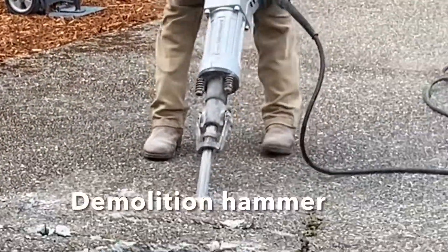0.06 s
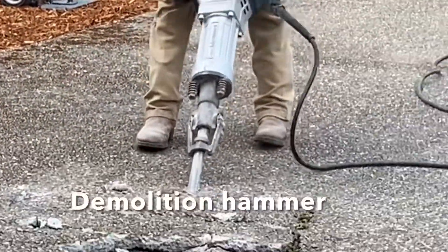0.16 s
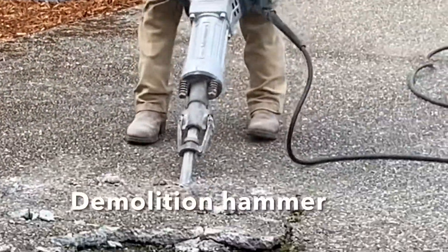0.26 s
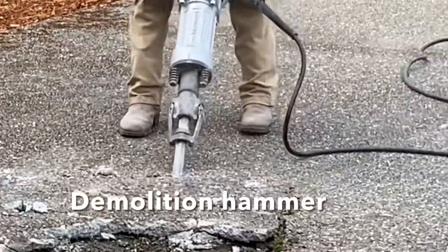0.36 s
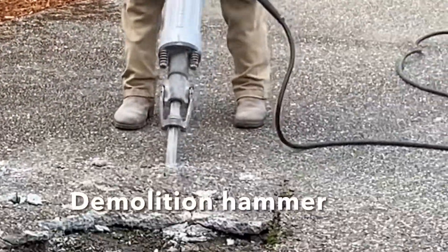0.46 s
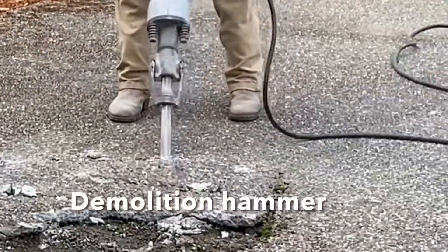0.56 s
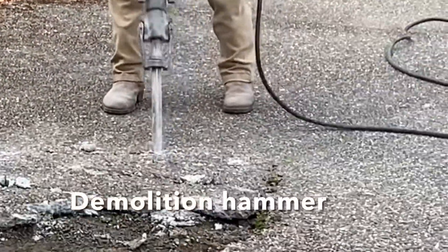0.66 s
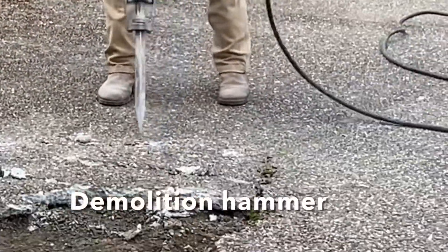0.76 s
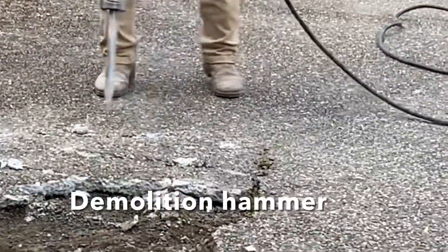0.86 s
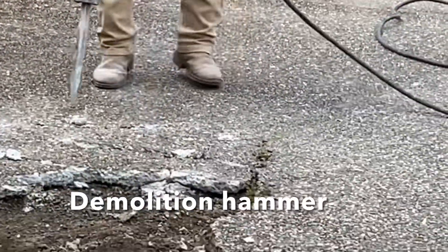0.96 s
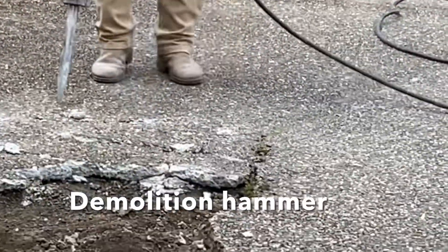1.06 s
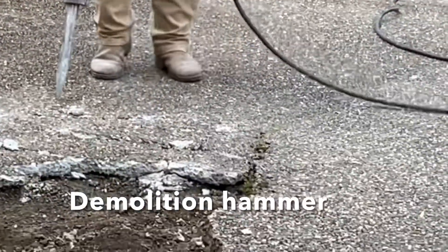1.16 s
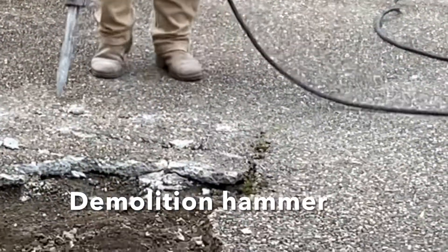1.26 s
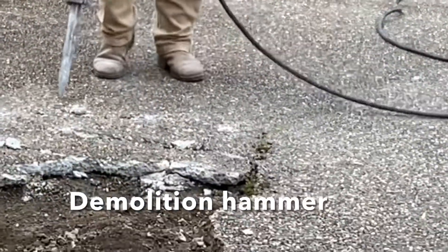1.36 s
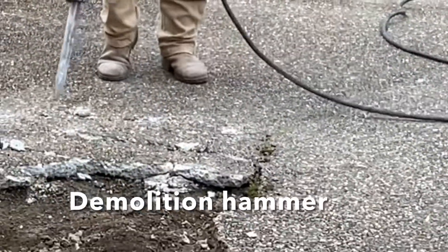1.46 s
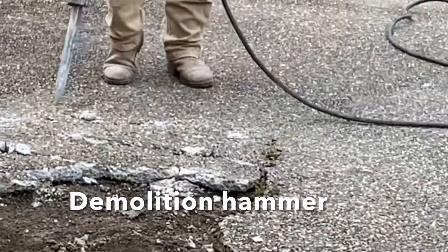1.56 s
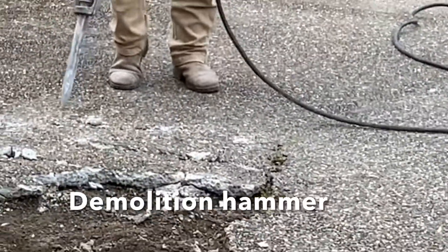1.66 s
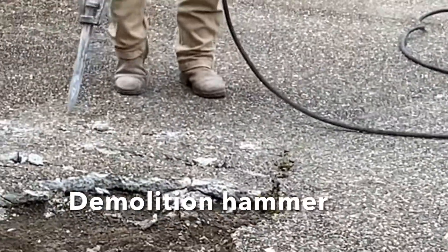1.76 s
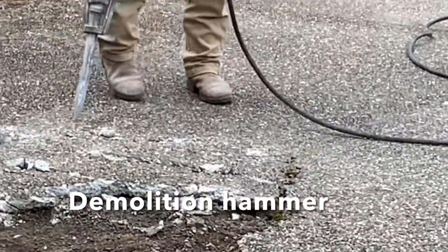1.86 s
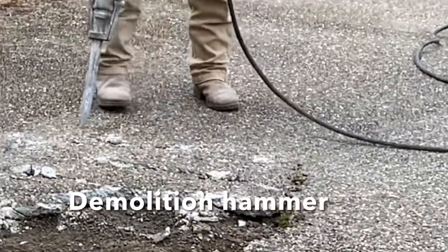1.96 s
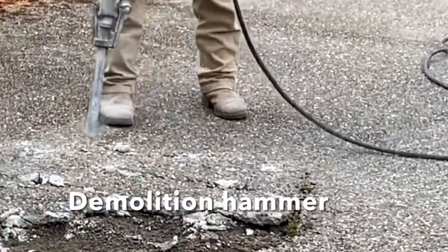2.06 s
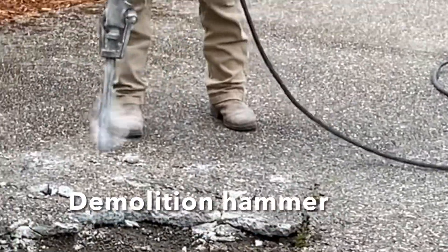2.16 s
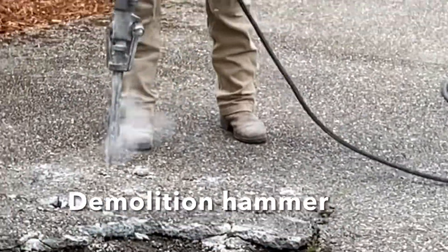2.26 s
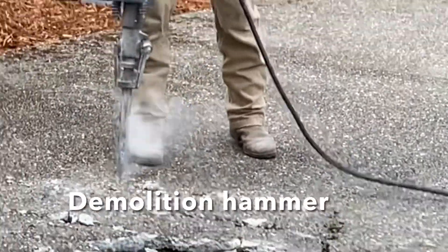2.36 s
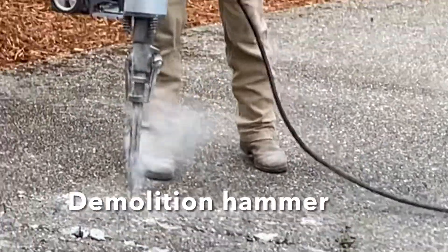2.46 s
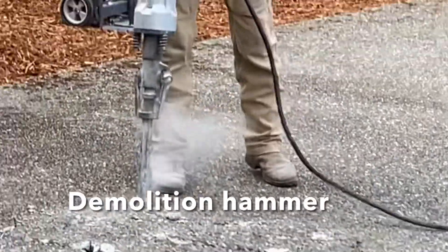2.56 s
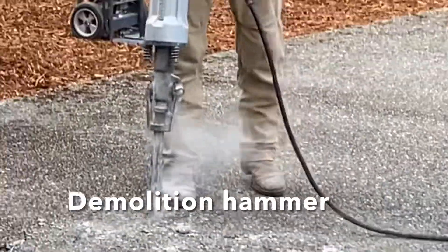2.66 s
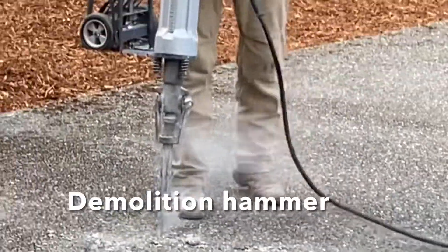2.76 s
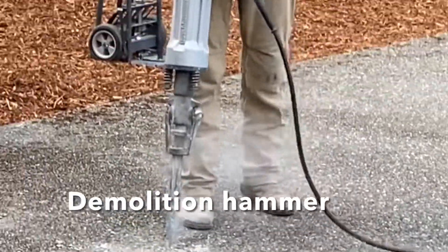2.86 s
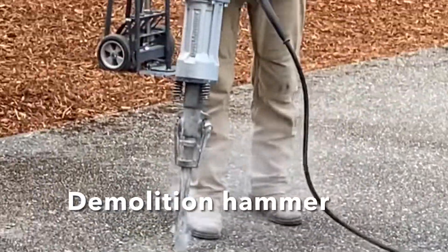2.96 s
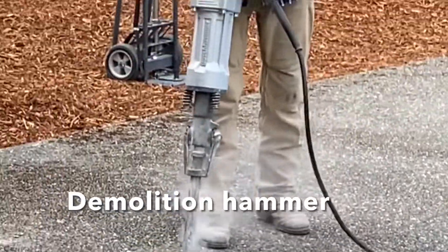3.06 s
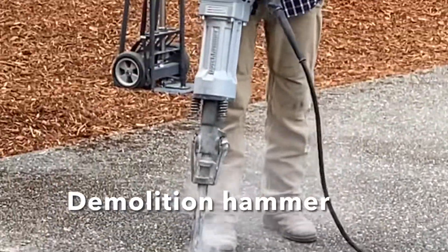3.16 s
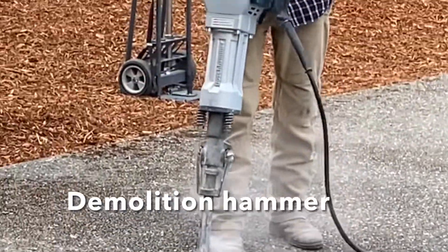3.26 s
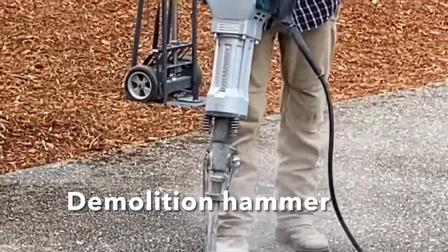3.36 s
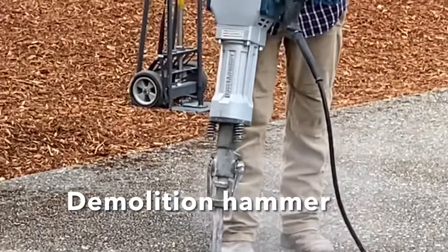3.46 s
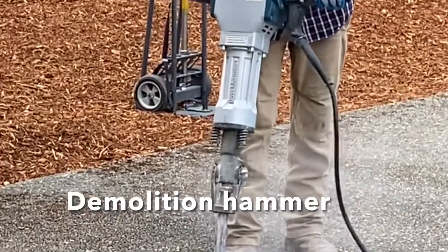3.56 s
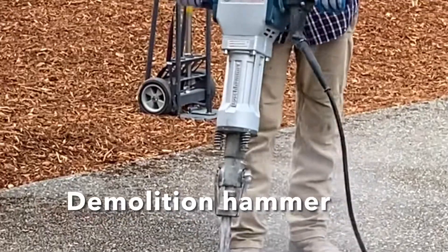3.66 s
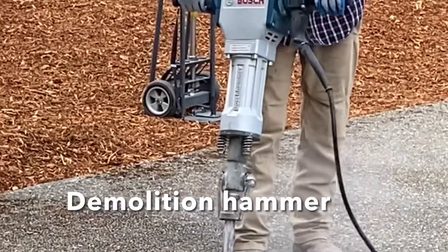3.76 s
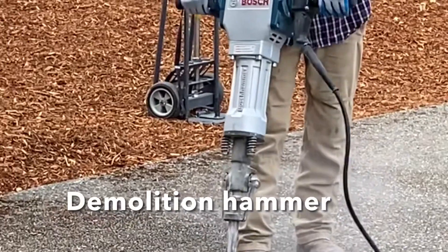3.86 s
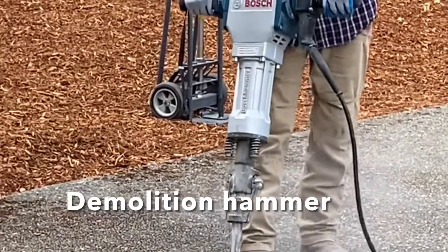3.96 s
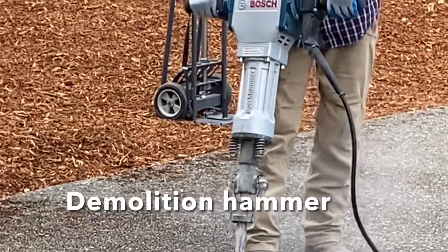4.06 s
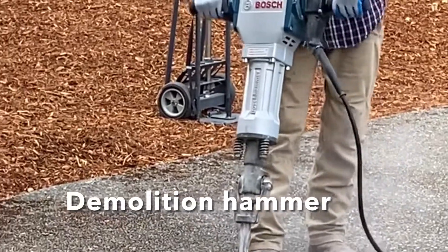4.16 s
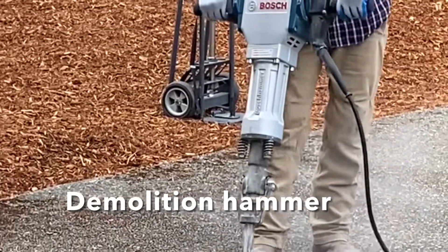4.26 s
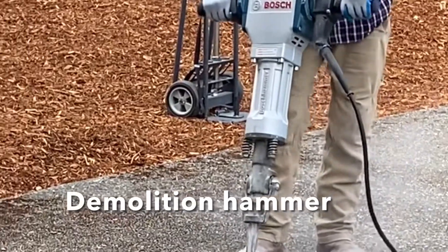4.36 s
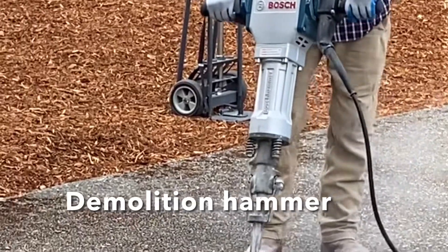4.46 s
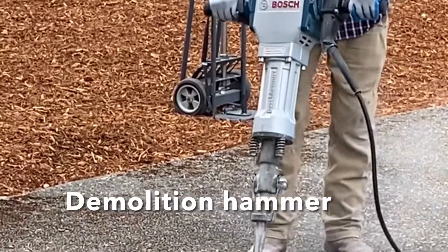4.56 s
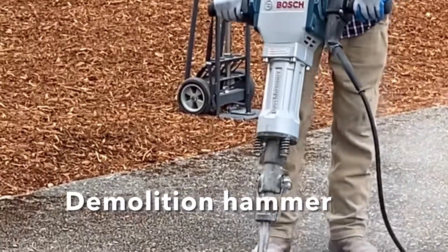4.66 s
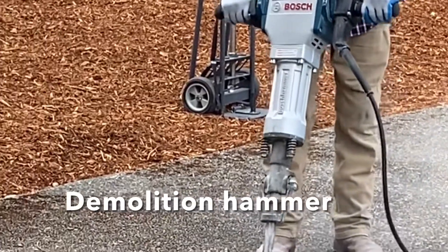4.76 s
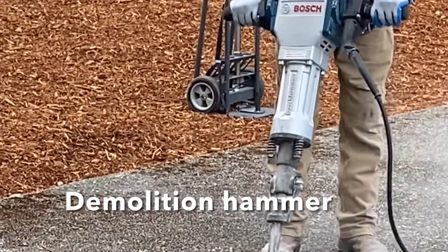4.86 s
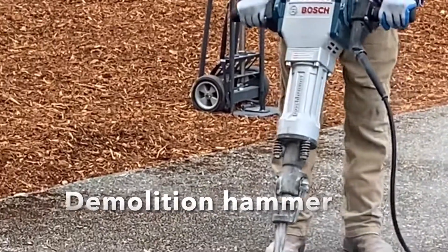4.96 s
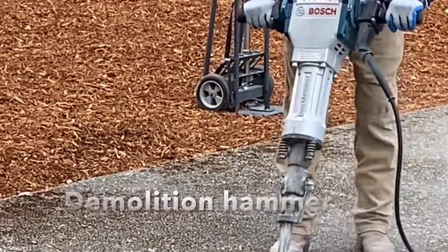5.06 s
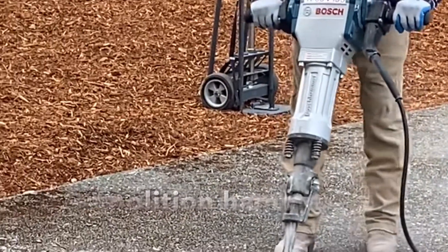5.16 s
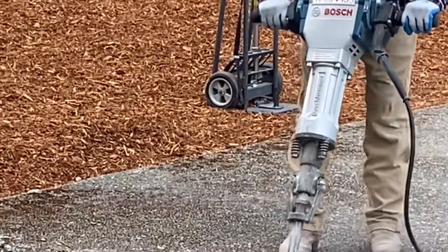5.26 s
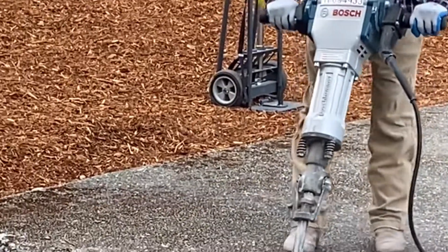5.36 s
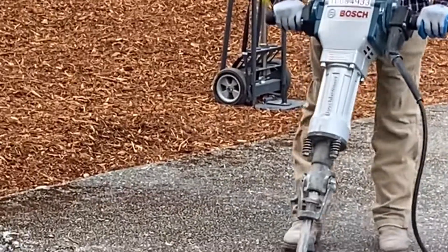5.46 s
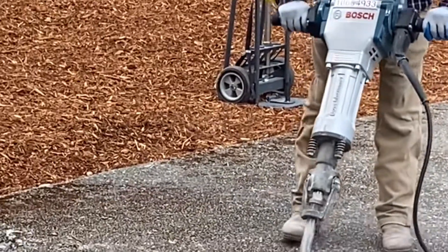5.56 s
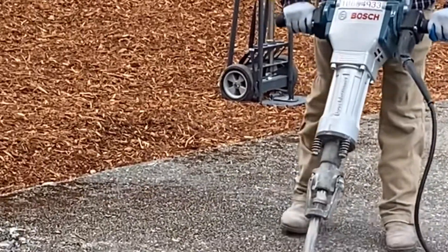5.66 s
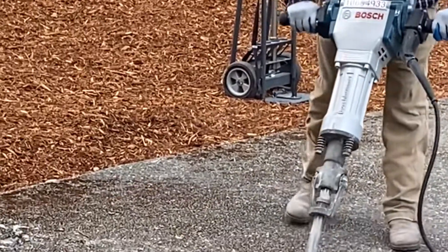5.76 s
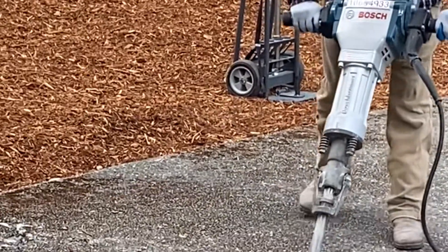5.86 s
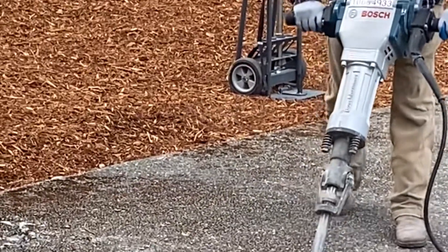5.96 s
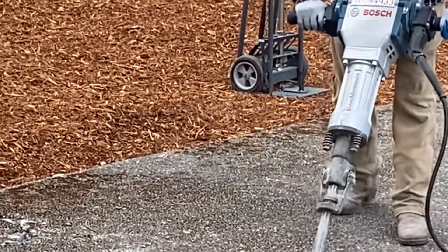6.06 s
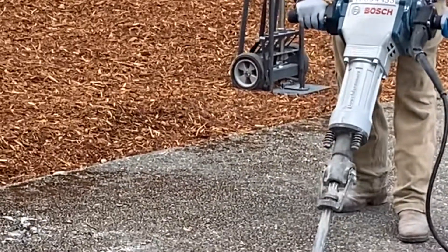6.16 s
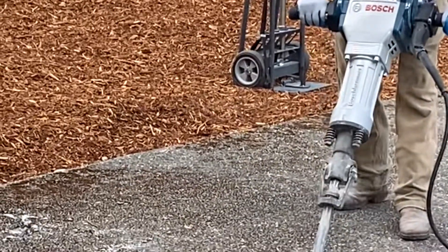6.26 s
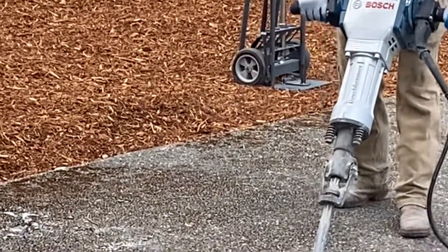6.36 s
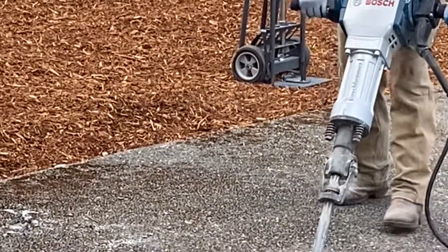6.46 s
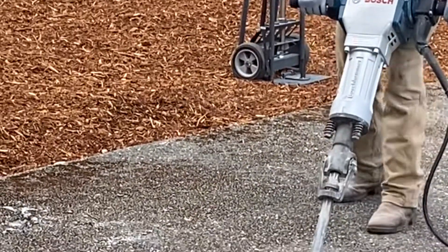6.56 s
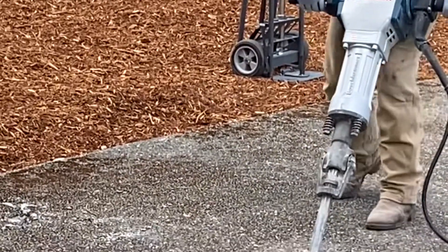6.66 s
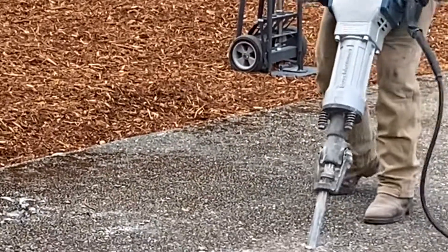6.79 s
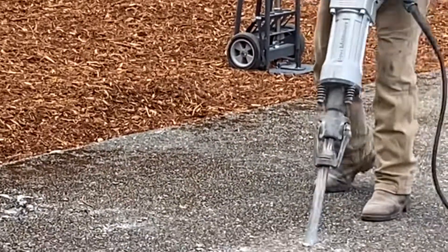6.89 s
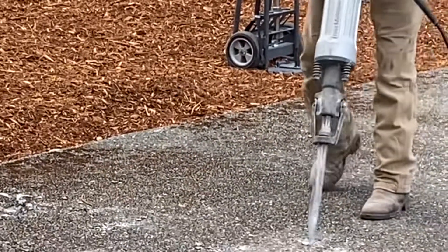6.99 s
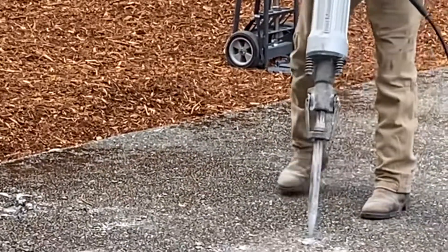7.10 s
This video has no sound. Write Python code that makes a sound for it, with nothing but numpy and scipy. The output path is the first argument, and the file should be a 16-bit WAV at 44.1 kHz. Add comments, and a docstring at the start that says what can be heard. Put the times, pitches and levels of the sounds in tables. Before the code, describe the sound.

A few steps away in an open yard, an electric breaker gives several loose, clattering blows, then its motor winds down in airy puffs. Boots scuff over low outdoor rumble and a faint thin whistle. Around two seconds it bursts into steady rapid hammering, sharp cracks over slab thumps and scattering grit, ringing at first and then drier. Finally the motor races, then slows with scrapes and stray clanks.

```python
"""An electric demolition hammer on a concrete slab in an open yard, with outdoor rumble behind it, heard from
a few steps away by a phone with two microphone ports. A short run of stray blows on the unloaded bit comes first.
The motor's fan and gears then run down with puffs of air, over scuffing boots and a far, thin whistle. The long run
follows at about 14 blows a second: each cracks, thumps down through the slab and scatters grit; the steel bit rings
until it wedges. The motor then races, and a few last stray blows and scuffs are heard as it slows."""
import sys
import numpy as np
from scipy import signal
from scipy.fft import rfft, irfft, next_fast_len
from scipy.io import wavfile
from scipy.ndimage import uniform_filter1d, map_coordinates

SR = 44100
rng = np.random.default_rng(int(sys.argv[2]) if len(sys.argv) > 2 else 0)


def int16_out(signal):
    """Quantize to a 16-bit WAV file."""
    q = np.round(np.clip(np.atleast_2d(signal).T, -1, 1) * 32767)
    wavfile.write(sys.argv[1], SR, q.astype(np.int16))


N = 314433
TIME = np.arange(N) / SR  # seconds
AGE = np.arange(SR // 3) / SR  # seconds since a blow
TOP_HZ = 16700  # the microphones' upper limit

# Colours below are relative: each noise or click is levelled to rms 1 after colouring.
# Outdoor background. Each row: frequency in Hz, level in dB per Hz.
AIR_COLOUR = [(20, -29), (42, -21.5), (62, 16), (110, 10.5), (180, -4), (400, -5.5), (1000, -7),
              (4000, -31), (16000, -38.5)]
# Thin whistle in the distance. Each row: time in seconds, level in dB before its waver.
WHISTLE_LEVEL = [(.85, -77), (1.1, -55), (1.3, -48), (1.5, -61), (1.65, -54), (1.9, -56), (2.3, -54),
                 (4.0, -50), (6.1, -50), (7.0, -49.5)]
# The steady noise dips early on, then partly recovers. Each row: time in seconds, level change in dB.
STEADY_DIP = [(0.03, -1), (.09, -17), (.28, -19.5), (.5, -10.5), (.9, -4.5)]

# Crank speed before it sags under load. Each row: time in seconds, turns a second.
CRANK_SPEED = [(0, 14.0), (0.35, 14.1), (1.82, 5), (1.96, 9.764), (2.22, 13.697), (2.65, 13.918),
               (2.71, 14.815), (2.98, 13.659), (3.18, 14.31), (4.64, 13.583), (5.48, 13.55), (5.99, 14.407),
               (6.2, 15.5), (6.4, 17.2), (6.5, 17.8), (6.57, 17.2), (6.74, 15.1), (7.13, 11.5)]
# Colour of the fan's rush. Each row: frequency in Hz, level in dB per Hz.
FAN_COLOUR = [(100, -5), (450, -4.5), (650, 2), (850, 3.5), (1100, 1.5), (1700, -1), (2250, 0.5),
              (2700, -2), (3300, 0), (5300, 0), (6500, -13), (9500, -12), (12000, -18), (16000, -29)]
# Gear and armature whine. Each row: cycles per crank turn, dB re fan rush before the gear level below,
# dB more while the piston squeezes, roughness from 0 to 1.
GEAR_WHINE = [(128.5, -10, 6, .6), (197.1, -11, -3, .22), (257, -13.5, 8, .3), (385.5, -17, 9, .4)]
# How strongly the gears sing; they fall quiet once the trigger is let go. Each row: time in seconds, level in dB.
GEAR_LEVEL = [(0.03, 3), (0.12, -3), (0.4, -6), (0.7, -10), (1.8, -25), (2.0, -1), (6.1, -1), (6.25, -3),
              (6.48, 1), (6.7, -2), (6.82, -9), (7.13, -14)]
# Resonances of the tool's housing. Each row: frequency in Hz, width in Hz, level in dB.
HOUSING_MODES = [(821, 28, -8.5), (1340, 77, -7.5), (1720, 260, -47.5), (2452, 88, -10.5), (3043, 97, -6),
                 (3420, 130, -1), (3577, 39.4, -4.5), (4113, 54, -6), (5750, 330, -6), (5770, 150, 0)]
# Fan level at median speed in dB, its growth in dB per tenfold speed, the most it gains when racing in dB.
RUSH_DB, RUSH_LAW_DB, RACING_DB = -38, 37, 2.5

# Stray blows on the unloaded bit. Each row: time in seconds, crack in dB, treble re crack in dB,
# steel ping re crack in dB, thump in dB, bit fundamental, overtone, bending and cross bending in dB,
# bit t60 in seconds before its stretch. Each sound adds its own trim to these levels.
STRAY_BLOWS = [(0.057, -31, 18, -4.5, -35, -9.5, -24.5, -41, -42, 0.045),
               (0.0657, -31.5, 9.5, -0.5, -62, -1.5, -23, -27, -23, 0.021),
               (0.127, -40, 0, -0.5, -55, -28, -31.5, -41, -36, 0.073),
               (0.1332, -31.5, 11.5, 0, -62, 1, -34, -35, -21, 0.016),
               (0.1977, -42, 7, 0.5, -61, -20.5, -33, -52, -52, 0.039),
               (0.206, -41, 11, 4, -67, -10.5, -44.5, -46, -48, 0.021),
               (0.2688, -33.5, 3, 1, -65.5, -22.5, -38.5, -48, -51.5, 0.037),
               (0.271, -34.5, -2.5, 4, -51, -8, -36.5, -50, -45.5, 0.02),
               (0.341, -31.5, -8.5, 6.5, -47, -9, -35.5, -49.5, -49, 0.033),
               (6.771, -28, 4.5, -4, -34, -54, -52, -56, -54, 0.15),
               (6.844, -24.5, -9, 11, -50, -26.5, -32, -20, -22.5, 0.41),
               (6.893, -36.5, -4, 6, -70, -21.5, -30, -50, -46, 0.076)]
# Blows of the long run. Each row: time in seconds, crack in dB, treble re crack in dB,
# steel ping re crack in dB, thump in dB; trims as above.
LONG_RUN = [(1.9623, -25, -0.5, -1.5, -31), (2.0586, -21, -3.5, 5, -32.5), (2.1408, -22.5, -0.0, 7, -28.5),
            (2.2177, -24.5, 1, 1, -26.5), (2.2908, -18, -0.5, -0.5, -28.5), (2.3645, -20, 2, 6.5, -27),
            (2.4366, -21, -1, 1.5, -29.5), (2.509, -19, 3, 0.5, -27), (2.5798, -26, 5.5, 1, -26.5),
            (2.653, -21, -3.5, 0, -26), (2.7214, -26.5, -6, 4.5, -27.5), (2.79, -21.5, -1, 3, -28.5),
            (2.8606, -24, -2, 3.5, -29), (2.9311, -25, 1.5, 4.5, -27.5), (3.0041, -24, -6, 3.5, -31),
            (3.0744, -23, -2, 4.5, -27), (3.147, -29, 7, 5, -28.5), (3.2163, -21.5, -4.5, 2.5, -27.5),
            (3.2876, -24.5, -0.5, 1, -28.5), (3.3578, -23, -1.5, 0.5, -27.5), (3.4289, -28.5, 6, 2, -26),
            (3.4994, -23, -2, 3.5, -27), (3.5687, -21.5, -4, -1, -28), (3.6402, -20, -2, -3, -26),
            (3.7117, -21.5, -1, 2.5, -26.0), (3.7836, -19.5, -2.5, -1.5, -27.5),
            (3.8551, -21, -0.5, -5, -26.5), (3.926, -20.5, -0.5, -2, -24.5), (3.9979, -19, -5, -5, -25.5),
            (4.0698, -20, -1, -4, -24), (4.142, -18, -6, -3.5, -24), (4.2139, -19, -1.5, -5.5, -23.5),
            (4.2867, -20.5, -2, -2, -24.5), (4.359, -21, -1.5, -6.0, -25.5), (4.4323, -20, 0, -6, -26.5),
            (4.5055, -21, -0.5, -3, -27), (4.5793, -19.5, -5, -3.5, -27.5), (4.6533, -19.5, -4, -4, -29.5),
            (4.7268, -20, 1.5, -8, -28.5), (4.8005, -20.0, 1.5, -4, -27.5), (4.874, -16.5, -3, -6, -27.5),
            (4.948, -18, -6.5, -0.5, -27), (5.021, -18.5, -2, -6.5, -25), (5.0945, -18.5, -1, -7.5, -26),
            (5.1683, -18.5, -0.5, -2.5, -27), (5.242, -20, 1, -3, -29), (5.3161, -19, -4.5, 2.5, -27.5),
            (5.3902, -18.5, -5.5, 2, -31), (5.4641, -18, -3.5, 1, -36), (5.5367, -18.5, -2.5, 5, -43.5),
            (5.6103, -17, -8, 2, -38.5), (5.6825, -18.5, -6.5, 5, -41), (5.754, -18.5, -5.5, 0, -39),
            (5.8242, -18.5, -2.5, -2.5, -38), (5.8963, -18.5, -5.5, -2.0, -36.5),
            (5.9657, -18, -4.5, -4, -37), (6.035, -20, -8.5, -2, -36), (6.1006, -20.5, -10.5, 0.5, -35.5),
            (6.1648, -23, -22, -0.5, -37.5)]
# Bit ring while it still sits loose. Each row: time in seconds, fundamental, overtone, bending and
# cross bending in dB, seconds until it lands, chatter re ring in dB.
LOOSE_RING = [(1.96, -37.5, -41, -42, -53, 0.025, -20), (2.06, -35, -34, -49, -54, 0.028, -18),
              (2.14, -22, -28, -38, -42, 0.045, -10), (2.22, -21, -28, -33.5, -35, 0.048, -17),
              (2.29, -29.5, -25.5, -57.0, -41, 0.021, -6), (2.36, -22.5, -23.5, -38, -38, 0.045, -13),
              (2.44, -35, -31, -42, -37, 0.025, -10), (2.51, -29.5, -23.5, -41, -31.5, 0.042, -16),
              (2.58, -32.5, -23, -57, -33, 0.024, -7), (2.65, -28, -23, -32.5, -27.5, 0.032, -11),
              (2.72, -25.5, -30, -50, -35, 0.048, -11), (2.79, -34, -35, -54, -38, 0.021, -3),
              (2.86, -35, -34.5, -58.0, -38, 0.039, -9), (2.93, -36, -28, -56.0, -37, .036, -11),
              (3.0, -37, -48.0, -61.0, -59.0, .026, -16), (3.07, -40, -38, -56.0, -42, .026, -14),
              (3.15, -31, -36.5, -60.0, -60, 0.044, -16), (3.22, -38, -51, -62.5, -59.0, .02, -16),
              (3.29, -52, -48, -65.0, -61.0, .02, -16), (3.36, -43.5, -46.5, -55, -58.0, .026, -16),
              (3.43, -37.5, -38, -61.0, -59.0, 0.05, -16)]
# Ring left once the bit is wedged in its hole. Each row: time in seconds, fundamental, overtone,
# bending and cross bending in dB.
WEDGED_BIT = [(3.5, -46, -62, -62, -62), (5.9, -58.5, -56, -66, -64), (6.17, -66, -70.5, -70, -67)]
RING_T60_S = 0.72  # bit decay in the long run, before its stretch and choke
FREE_S, CHATTER_DB = 0.041, -18.5  # time to land and chatter re ring, when wedged or unloaded

# Colour of the blow in the tool's housing. Each row: frequency in Hz, level in dB per Hz.
CRACK_COLOUR = [(300, -35.5), (900, -15), (2000, -8), (2750, -7), (3550, -0.5), (4000, -2), (4700, 0),
                (5500, 4), (6500, -4), (8000, -8), (11000, -8), (13000, -10), (15600, -15), (16500, -58)]
# Concrete crushed under the tip. Each row: frequency in Hz, level in dB per Hz.
CRUNCH_COLOUR = [(150, -8), (450, -1.5), (800, -2), (1300, -4.5), (2500, -9.5), (8000, -33)]
# Concrete knock under the tip, its pitch wandering and ending higher. Each row: time in seconds,
# pitch in Hz before small scatter, level re crack in dB.
KNOCK_PITCH = [(2.1, 758, -16), (2.5, 797, -5.5), (2.9, 740, -22.5), (4.3, 737, -12.5), (4.6, 770, -17.5),
               (5.0, 788, -11), (5.5, 854, -14), (5.9, 891, -10.5), (6.17, 914, -11.5)]
# Modes of that knock. Each row: multiple of its pitch, level in dB before scatter.
KNOCK_PARTIALS = [(1, -1), (1.19, -11.5), (1.58, -6)]
# Slab resonances. Each row: frequency in Hz, level in dB per Hz.
SLAB_COLOUR = [(35, -43.5), (70, -33), (113, -17), (155, -4), (195, -8.5), (250, 6), (325, -10), (390, -5),
               (445, 1), (540, -16.5), (700, -13.5), (1400, -42.5)]
# The slab's 450 Hz resonance, which speaks where the slab lies hollow. Each row: time in seconds, level in dB
# before its weighting over frequency.
HOLLOW_LEVEL = [(2.05, -3), (2.45, -0.5), (2.58, 6.5), (2.74, 6.5), (2.88, -5), (3.45, 2), (4.25, 4),
                (4.6, -2.5), (5.2, -2), (5.5, -7.5), (6.17, -3.5)]
# Ground answering as the tip sinks in. Each row: time in seconds, slow bounce re thump in dB,
# rumble re thump in dB; trims come later.
GROUND_ANSWER = [(2.04, -17.5, -12), (2.2, -13.5, -3.5), (2.6, -31, -4), (2.87, -17, -5.5), (3.2, -21, -3),
                 (4.15, -16, -17.5), (4.65, -7, -10.5), (5.1, -12, -11), (5.38, -11, -28), (5.53, -2, 5.5),
                 (6.17, -15, -11.5)]
# Ground rumble under the blows. Each row: frequency in Hz, level in dB per Hz.
RUMBLE_COLOUR = [(25, -21), (42, -22), (60, 4), (115, 4.5), (170, 0.5), (280, -0.5), (500, -9),
                 (1200, -36.5)]
# Modes of the bit. Each row: frequency in Hz before slight detuning, level in dB,
# family (0 lengthwise fundamental, 1 lengthwise overtone, 2 bending, 3 cross bending).
BIT_MODES = [(5607, 1, 0), (11140, 4, 1), (11100, -6.5, 2), (4796, 5, 2), (3040, -10, 3), (6740, -5.5, 3),
             (8910, -3, 3)]
# Flying grit. Each row: frequency in Hz, level in dB per Hz.
GRIT_COLOUR = [(400, -29.5), (1500, -3.5), (5000, 6.5), (10000, 0), (15500, -12.5), (17000, -31)]
# Fewer chips fly as the tip sinks in. Each row: time in seconds, level in dB.
CHIP_LEVEL = [(2.0, 6), (3.3, 1.5), (5.0, -0.5), (6.1, -7)]
# Retainer and freed bit ringing on after a throw. Each row: start in seconds, frequency in Hz, level in dB,
# t60 in seconds.
CLINK_TONES = [(0.069, 3050, -26, 0.065), (0.346, 5612, -50, 1.1), (6.772, 3110, -29, 0.065)]

# Piston puffs on the coasting crank. Each row: centre in seconds, peak in dB before roughening.
PISTON_PUFFS = [(0.505, -45), (0.59, -44), (0.675, -51), (0.77, -47.5), (0.865, -61), (1.13, -50),
                (1.28, -51.5)]
PUFF_S = 0.069  # length of one puff
# Colour of the puffs. Each row: frequency in Hz, level in dB per Hz.
PUFF_COLOUR = [(300, -15), (900, 0.5), (2500, 0.5), (5300, -7.5), (6800, -17), (14000, -32)]
# Boots and carried tool on the ground. Each row: start in seconds, level in dB, thud re level in dB,
# scrape t60 in seconds.
GROUND_SCUFFS = [(0.995, -29.5, -10, 0.14), (1.132, -38, -19, .06), (1.477, -39, -7.5, 0.066),
                 (1.553, -40, -24, 0.039), (1.645, -43.5, -7, 0.078), (1.712, -44, -3.5, .06),
                 (1.821, -30.5, -25, 0.037), (6.757, -24, -12.5, .049), (6.822, -16, -41.5, .049)]
# Colours of scrape and thud. Each row: frequency in Hz, level in dB per Hz.
SCRAPE_COLOUR = [(300, 1.0), (1000, -9), (4000, -2), (5500, -4), (7000, -10.5), (16000, -16.5)]
THUD_COLOUR = [(60, -20), (140, -8), (270, 16), (600, -35), (2000, -49.5)]
# Tip dragging over loose concrete. Each row: start in seconds, length in seconds, peak in dB before roughening.
TIP_DRAGS = [(1.851, 0.194, -46), (3.069, 0.17, -37)]
# Colour of the drags. Each row: frequency in Hz, level in dB per Hz.
DRAG_COLOUR = [(300, -12), (900, 0), (1900, -2.5), (3200, -3.5), (6000, -14), (14000, -29.5)]

# Echo time of the yard. Each row: frequency in Hz, t60 in seconds.
YARD_T60 = [(100, 0.14), (1000, 0.42), (5000, 0.042), (14000, 0.37)]
# The left port's lead over the right. Each row: frequency in Hz, phase in radians.
PORT_LEAD = [(100, 0), (200, -.15), (450, -.6), (950, -.7), (1500, -.3), (2450, .6), (3300, .1),
             (4400, .75), (5150, .25), (7300, 3.14), (8300, 4), (10000, 6.1), (11000, 6.8), (13300, 9.4),
             (16000, 12.4)]
# Left minus right port level. Each row: frequency in Hz, difference in dB.
PORT_LEAN = [(100, 0), (200, 1.5), (380, 1), (700, 0), (1300, -1.5), (2400, 0)]


def amp(db):
    """Decibels to gain."""
    return 10 ** (np.asarray(db) / 20)


def unit(x):
    """Scale to rms 1."""
    return x / np.sqrt(np.mean(x ** 2) + 1e-20)


def along(points, hz):
    """Read (Hz, value) points on a log frequency axis."""
    f, v = np.transpose(points)
    return np.interp(np.log(hz + 1), np.log(f + 1), v)


def curve(rows):
    """(s, value) rows as one value per sample."""
    return np.interp(TIME, *np.transpose(rows))


def sampled(rows, s):
    """Each column of a table at the times s."""
    knots, *columns = np.transpose(rows)
    return np.array([np.interp(s, knots, column) for column in columns])


def wobble(rate):
    """A smooth random curve with rate knots a second."""
    return map_coordinates(rng.standard_normal(int(N * rate / SR) + 4), [TIME * rate])


def filtered(x, response):
    """x shaped by a complex response of frequency."""
    n = x.shape[-1]
    m = next_fast_len(n + 4096)  # room for filter tails
    return irfft(rfft(x, m) * response(np.fft.rfftfreq(m, 1 / SR)), m)[..., :n]


def coloured(x, spectrum):
    """x with a (Hz, dB) colour, at rms 1."""
    return unit(filtered(x, lambda hz: amp(along(spectrum, hz))))


def noises(spectrum, count):
    """Short coloured noises, one a row."""
    return coloured(rng.standard_normal((count, len(AGE))), spectrum)


def burst(attack, t60):
    """A quick rise and an exponential fall, both in seconds."""
    return (1 - np.exp(-AGE / attack)) * np.exp(-np.log(1000) * AGE / t60)


def placed(times, sounds):
    """Lay each short sound at its time."""
    out = np.zeros(N + SR)
    for s, sound in zip(times, sounds):
        out[max(round(s * SR), 0):][:len(sound)] += sound
    return out[:N]


def strikes():
    """Long-run and stray blows, a row each: columns as in STRAY_BLOWS, then time to land and chatter."""
    s = np.transpose(LONG_RUN)[0]
    long_run = np.column_stack([LONG_RUN, sampled(WEDGED_BIT, s).T, np.full(len(s), RING_T60_S)])
    rows = np.vstack([long_run, STRAY_BLOWS])
    rows = np.column_stack([rows, np.tile([FREE_S, CHATTER_DB], (len(rows), 1))])
    for when, *levels, free, chatter_db in LOOSE_RING:
        rows[np.argmin(abs(s - when)), 5:] = *levels, RING_T60_S, free, chatter_db
    return rows


def background(dip_share=0.66, air_db=-57, whistle_hz=2375):
    """Outdoor rumble, which shares part of the dip, and a thin, wavering whistle of narrow-band noise."""
    air = coloured(rng.standard_normal(N), AIR_COLOUR)
    narrow = lambda hz: 1 / (1 + ((hz - whistle_hz) / 72) ** 2)
    whistle = unit(filtered(rng.standard_normal(N), narrow))
    waver = amp(3 * wobble(28) - 2)
    air_level = amp(air_db + dip_share * curve(STEADY_DIP))
    return air_level * air + amp(curve(WHISTLE_LEVEL)) * waver * whistle


def housing(hz):
    """Response of the housing's resonances, summed with alternating sign."""
    response = 0
    for k, (centre, width, db) in enumerate(HOUSING_MODES):
        damping = 1j * hz * width
        response = response + (-1) ** k * amp(db) * damping / (centre ** 2 - hz ** 2 + damping)
    return response


def singing(hz, peak_db=8):
    """The gear case sings out whichever partial passes near 3.45 kHz."""
    nearness = 1 / (1 + ((hz - 3450) / 280) ** 2)
    return 1 + (amp(peak_db) - 1) * nearness


def motor(whine_db=0, body_db=-8, squeeze_db=1, flicker_db=3.04, dull_db=-4):
    """Fan rush and gear whine follow the crank, which strains and slows as the piston squeezes air."""
    s = np.append(STRAY_BLOWS[0][0], np.transpose(LONG_RUN)[0])
    effort = rng.uniform(.55, 1.3, (len(s), 1))
    squeeze = placed(s - .024, effort * signal.windows.hann(SR // 33))
    strain = placed(s - .034, effort * signal.windows.hann(SR // 16))
    speed = curve(CRANK_SPEED)
    sag = .13 * (strain - uniform_filter1d(strain, SR // 7))  # fraction of the speed
    turns = np.cumsum(speed * (1 + .002 * wobble(40) - sag)) / SR
    coasting = np.clip((13.5 - speed) / 4, 0, 1)
    engaged = 1 - .9 * coasting

    speed_db = np.minimum(RUSH_LAW_DB * np.log10(speed / np.median(speed)), RACING_DB)
    level = amp(RUSH_DB + speed_db + curve(STEADY_DIP) + squeeze_db * squeeze)

    whine = 0
    for order, db, load_db, rough in GEAR_WHINE:  # the teeth mesh unevenly
        mesh = np.sin(2 * np.pi * order * turns + 1.5 * rough * wobble(260))
        waver_db = 2.5 * wobble(45)
        whine = whine + amp(db + load_db * squeeze + waver_db) * singing(order * speed) * mesh
    whine = whine * amp(whine_db + curve(GEAR_LEVEL))

    rush = coloured(rng.standard_normal(N), FAN_COLOUR)
    hiss = filtered(rush, lambda hz: along([(4000, 0.064), (7000, 1.0)], hz))
    rush = rush + (amp(dull_db * coasting) - 1) * hiss  # a slow fan is duller
    rush = rush * amp(flicker_db * wobble(90))
    body = unit(filtered(rng.standard_normal(N), housing))
    return level * (unit(rush + engaged * amp(body_db) * body) + engaged * whine)


def cracks(blows, alike=0.52, crack_db=5.5, contact_s=0.0035, contact_db=5, crunch_db=-2.0,
           treble_db=5, clank_db=0, ping_hz=5550, ping_width_hz=650, seat_db=1.5):
    """The striker hits the bit: seated steel pings, the housing clanks, the concrete crushes anew."""
    s, db, bright_db, ping_db = np.transpose(blows)[:4, :, None]
    share = np.clip(alike, 0, 1)
    same = noises(CRACK_COLOUR, count=1)
    fresh = noises(CRACK_COLOUR, count=len(s))
    steel = np.sqrt(share) * same + np.sqrt(1 - share) * fresh

    # the seat favours other resonances at each blow, partly the same as at the last
    bands = np.geomspace(600, 16000, 44)
    seats = uniform_filter1d(rng.standard_normal((len(s), len(bands))), size=2, axis=0)
    seats = seat_db * unit(seats)
    steel = unit(filtered(steel, lambda hz: amp([np.interp(hz, bands, seat) for seat in seats])))
    # every blow is levelled over its first 1/150 s
    steel = steel / np.sqrt(np.mean(steel[:, :SR // 150] ** 2, axis=1)[:, None])
    treble = lambda hz: amp((bright_db + treble_db) * along([(4000, 0.029), (7500, 0.68)], hz))
    steel = filtered(steel, treble)
    contact = 1 / (1 + (AGE / contact_s) ** 6)  # loudest while the striker presses on the steel
    crack = amp(crack_db) * steel * burst(attack=0.00075, t60=0.032) * amp(contact_db * contact)

    mode_hz, width, level = np.transpose(HOUSING_MODES)
    shape = (len(s), len(HOUSING_MODES))
    kicks = amp(level + clank_db + rng.normal(0, 2.4, shape)) * np.exp(1j * rng.normal(0, 1, shape))
    modes = np.exp(np.pi * np.outer(2j * mode_hz - width, AGE))  # decaying spirals
    clank = np.imag(kicks @ modes) * burst(attack=0.0018, t60=0.94)

    ping = lambda hz: amp(ping_db / (1 + ((hz - ping_hz) / ping_width_hz) ** 4))
    metal = filtered(crack + clank, ping)
    crunch = amp(crunch_db) * noises(CRUNCH_COLOUR, count=len(s)) * burst(attack=0.0024, t60=0.059)
    return placed(s[:, 0], amp(db) * (metal + crunch))


def knocks(blows, knock_db=0, t60=0.044, vary_db=2):
    """A short hollow knock of the concrete, nearly the same in pitch from blow to blow."""
    s, db = np.transpose(blows)[:2, :, None]
    hz, level = sampled(KNOCK_PITCH, s)
    hz = hz * (1 + .02 * rng.standard_normal(s.shape))
    knock = 0
    for ratio, mode_db in KNOCK_PARTIALS:
        gain = amp(mode_db + vary_db * rng.standard_normal(s.shape))
        knock = knock + gain * np.sin(2 * np.pi * ratio * hz * AGE)
    fall = burst(attack=0.0044, t60=t60)
    return placed(s[:, 0], amp(db + level + knock_db) * knock * fall / fall.max())


def slab(blows, lag_s=0.062, bend_hz=98, thump_db=-12.5, vary_db=1.5):
    """Bending waves in the slab: high ones travel faster, so each thump sweeps downward."""
    s, _, _, _, db = np.transpose(blows)[:5]
    click = (AGE == 0) * 1.
    # delay = lag_s / (1 + hz / bend_hz)
    sweep = lambda hz: np.exp(-2j * np.pi * lag_s * bend_hz * np.log1p(hz / bend_hz))
    thump = unit(filtered(click, lambda hz: amp(along(SLAB_COLOUR, hz)) * sweep(hz)))
    # the tip meets the slab a little differently every time
    bands = np.transpose(SLAB_COLOUR)[0]
    seats = rng.normal(0, vary_db, (len(s), len(SLAB_COLOUR)))
    hollow_share = along([(300, 0), (420, 0.76), (540, 0.93), (750, 0.56)], bands)
    seats = seats + np.outer(sampled(HOLLOW_LEVEL, s)[0], hollow_share)
    seating = lambda hz: amp([np.interp(hz, bands, seat) for seat in seats])
    thumps = filtered(np.tile(thump, (len(s), 1)), seating)
    rubble = .8 * noises(SLAB_COLOUR, count=len(s)) * burst(attack=0.017, t60=0.096)
    return placed(s, amp(db + thump_db)[:, None] * (thumps + rubble))


def heave(blows, heave_hz=113, heave_db=-5, heave_s=0.039):
    """The whole slab rocks for a few cycles under each blow."""
    s, _, _, _, db = np.transpose(blows)[:5]
    swell = np.sin(np.pi * np.minimum(AGE / heave_s, 1)) ** 2
    rock = np.sin(2 * np.pi * heave_hz * AGE) * swell
    return placed(s, amp(db + heave_db)[:, None] * rock)


def boom(blows, ground_hz=64, boom_db=8, rumble_db=4):
    """The ground under the slab bounces slowly with each blow and rumbles on after it."""
    s, _, _, _, db = np.transpose(blows)[:5]
    bounce_db, shake_db = (db + sampled(GROUND_ANSWER, s))[:, :, None]
    bounce_db = bounce_db + boom_db + rng.normal(0, 0.95, bounce_db.shape)
    bounce = np.sin(2 * np.pi * ground_hz * AGE) * burst(attack=0.019, t60=0.57)
    rumble = noises(RUMBLE_COLOUR, count=len(s)) * burst(attack=0.012, t60=0.32)
    return placed(s, amp(bounce_db) * bounce + amp(shake_db + rumble_db) * rumble)


def bit(blows, ring_db=1, detune=0.0012, flutter_db=3.5, choke_db=-18, linger_db=-43,
        chatter_rise=1.6, chatter_rough=0.11):
    """The steel bit rings lengthwise and in bending; it chatters ever faster in its holder until it lands."""
    s, _, _, _, _, *family_db, t60, free, chatter_db = np.transpose(blows)[:, :, None]
    shape = (len(s), len(AGE))
    drift = lambda: np.cumsum(rng.standard_normal(shape), axis=1)
    ring = 0
    for hz, db, family in BIT_MODES:
        phase = 2 * np.pi * hz * (1 + detune * rng.standard_normal(s.shape)) * AGE
        tone = np.sin(phase + .018 * drift())
        if family < 2:  # the chatter throws a rough, rising sideband off the lengthwise modes
            rise = chatter_rise * rng.uniform(.5, 0.82, s.shape) * np.minimum(AGE, free)
            rising_phase = 2 * np.pi * hz * np.cumsum(1 + rise, axis=1) / SR
            sideband = np.sin(rising_phase + chatter_rough * drift())
            tone = tone + amp(chatter_db) * np.minimum(AGE / free, 1) ** .5 * sideband
        flutter = unit(uniform_filter1d(rng.standard_normal(shape), SR // 250, 1))
        flutter = flutter_db * flutter * np.minimum(AGE / 0.0095, 1)
        ring = ring + amp(family_db[round(family)] + db + ring_db + flutter) * tone
    choke = amp(choke_db * np.clip((AGE - free) / 0.015, 0, 1))  # landing damps the steel
    fading = burst(attack=0.00031, t60=1.47 * t60) * choke
    lingering = amp(linger_db) * burst(attack=.01, t60=0.65)
    return placed(s[:, 0], ring * (fading + lingering))


def grit(blows, per_second=900, grit_db=-18, spread_db=2.0):
    """Chips scatter and the loose bit chatters after each blow, as random short noise ticks."""
    s, db = np.transpose(blows)[:2]
    shape = (len(s), len(AGE))
    falls = rng.random(shape) < per_second / SR
    chips = falls * rng.standard_normal(shape) * amp(spread_db * rng.standard_normal(shape))
    tick = (rng.standard_normal(len(AGE)) * burst(attack=.0001, t60=0.007))[None]
    chips = coloured(signal.fftconvolve(chips, tick, axes=1)[:, :len(AGE)], GRIT_COLOUR)
    level = amp(db + grit_db + sampled(CHIP_LEVEL, s)[0])[:, None]
    return placed(s, level * chips * burst(attack=0.018, t60=0.56))


def clinks():
    """Steel rings on as decaying tones when the unloaded bit is thrown against its retainer."""
    s, hz, db, t60 = np.transpose(CLINK_TONES)[:, :, None]
    return placed(s[:, 0], amp(db) * np.sin(2 * np.pi * hz * AGE) * burst(attack=0.002, t60=t60))


def puffs():
    """Soft swells of air from the piston while the motor runs down."""
    swell = 0
    for s, db in PISTON_PUFFS:
        swell = swell + amp(db) * np.cos(np.pi * np.clip((TIME - s) / PUFF_S, -.5, .5))
    return swell * amp(2.9 * wobble(200)) * coloured(rng.standard_normal(N), PUFF_COLOUR)


def scuffs(scrape_db=-2, thud_db=0):
    """Boots and the carried tool on the ground: a gritty scrape over a soft thud."""
    s, db, low_db, t60 = np.transpose(GROUND_SCUFFS)[:, :, None]
    scrape = amp(scrape_db) * noises(SCRAPE_COLOUR, count=len(s)) * burst(attack=0.0044, t60=t60)
    thud = amp(low_db + thud_db) * noises(THUD_COLOUR, count=len(s)) * burst(attack=0.0072, t60=0.16)
    return placed(s[:, 0], amp(db) * (scrape + thud))


def drags(rough_db=3):
    """The tip grinds briefly over broken concrete: swells of roughened noise."""
    swell = 0
    for s, length, db in TIP_DRAGS:
        swell = swell + amp(db) * np.sin(np.pi * np.clip((TIME - s) / length, 0, 1))
    grind = coloured(rng.standard_normal(N), DRAG_COLOUR)
    return swell * grind * amp(rough_db * wobble(120))


def yard(x):
    """Scattered echoes of the yard without bass, 10 ms late and different at each port."""
    hz, t, z = signal.stft(rng.standard_normal((2, SR // 2)), SR, nperseg=256)
    decay = amp(-60 * t / along(YARD_T60, hz)[:, None])
    tail = signal.istft(z * decay, SR, nperseg=256)[1]
    tail = filtered(tail, lambda hz: amp(along([(100, -25.5), (350, 19.0)], hz)))
    tail = tail / np.linalg.norm(tail[0])
    late = np.pad(x, (SR // 100, 0))[None]
    return signal.fftconvolve(late, tail, axes=1)[:, :N]


def scene(echo_db=-20, motor_echo_db=-11):
    """Blows, motor and steps in the open yard; the boom and background raise no echo."""
    blows = strikes()
    hits = cracks(blows) + knocks(blows) + slab(blows) + heave(blows) + bit(blows) + grit(blows)
    hits = hits + clinks() + scuffs() + drags()
    running = motor() + puffs()
    echoes = amp(echo_db) * yard(hits) + amp(motor_echo_db) * yard(running)
    return background() + running + hits + boom(blows) + echoes


def record(dry):
    """The two ports differ in phase and level; peaks are rounded, deep rumble and the top are cut."""
    sides = np.array([[.5], [-.5]])  # left, right
    lean = lambda hz: amp(sides * along(PORT_LEAN, hz))
    lead = lambda hz: np.exp(1j * sides * along(PORT_LEAD, hz))
    ports = filtered(dry, lambda hz: lean(hz) * lead(hz))
    rounded = np.tanh(ports / .95) * .95
    low_cut = lambda hz: 1 - 1 / (1 + (hz / 35) ** 5)
    return filtered(rounded, lambda hz: low_cut(hz) * (hz < TOP_HZ))


dry = scene()
out = record(dry)
int16_out(out)
```